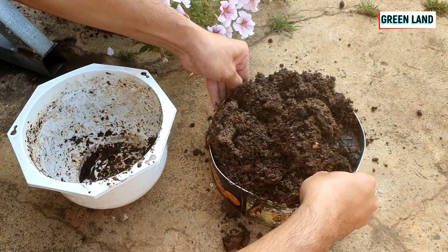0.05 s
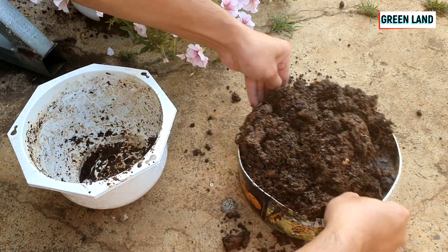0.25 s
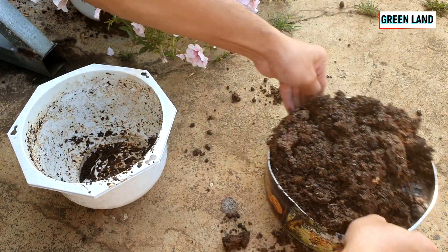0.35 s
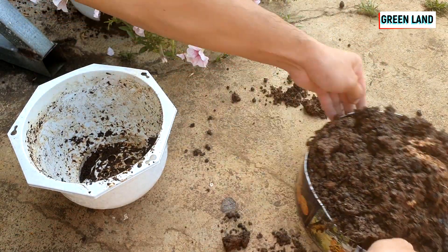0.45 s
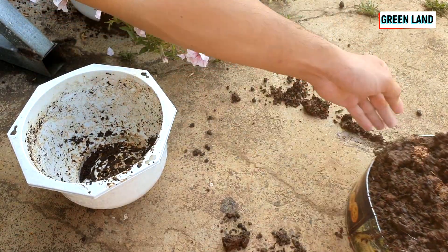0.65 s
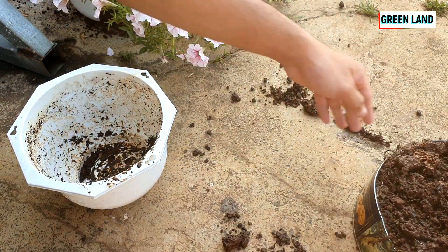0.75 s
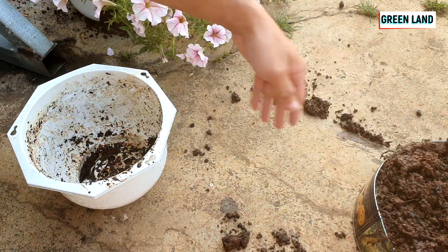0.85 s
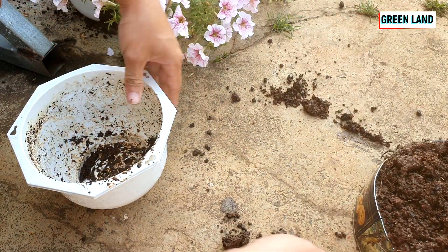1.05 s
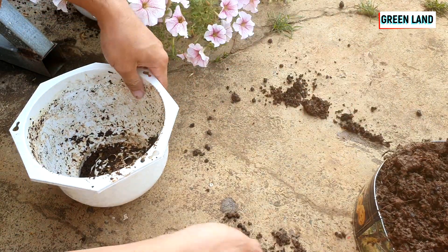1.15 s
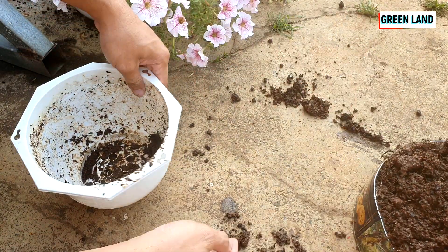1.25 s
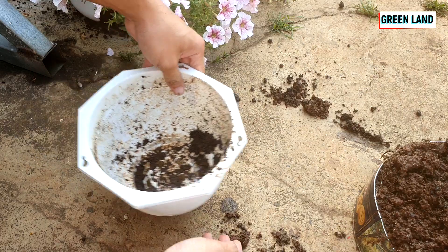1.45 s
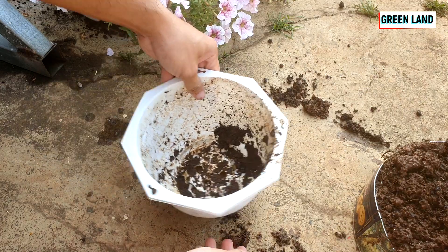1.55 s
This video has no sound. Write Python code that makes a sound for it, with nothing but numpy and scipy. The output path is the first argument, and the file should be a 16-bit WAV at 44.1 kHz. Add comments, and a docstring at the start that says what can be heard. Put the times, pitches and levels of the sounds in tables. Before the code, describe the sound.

A heavy pot of soil is dragged over rough concrete with a short, juddering scrape, sand crackling under it. A few crumbs drop, then fingers lightly tap an empty plastic pot. Close up, outdoors, over a faint rumble.

```python
"""Outdoors on rough concrete, close to a pair of microphones, over a low rumble and a faint hiss.
A heavy pot full of soil is nudged, then dragged: its base slips and catches, ringing the damped pot,
while sand is ground and cracks under it. The pot stops and three crumbs of soil drop.
Last, a hand takes up an empty plastic pot with light taps. Nearby walls give back short echoes."""
import sys
import numpy as np
from scipy import signal
from scipy.fft import rfft, irfft
from scipy.io import wavfile
from scipy.ndimage import map_coordinates

SR = 44100
rng = np.random.default_rng(int(sys.argv[2]) if len(sys.argv) > 2 else 0)


def generate_wav(sig):
    """Save sig (samples, or channels by samples) to the path in sys.argv[1] as 16-bit PCM at SR."""
    pcm = np.round(np.clip(np.atleast_2d(sig).T, -1, 1) * 32767).astype(np.int16)
    wavfile.write(sys.argv[1], SR, pcm)


N = 70560  # 1.6 s


def amp(db):
    """Decibels to gain."""
    return 10 ** (np.asarray(db) / 20)


def unit(x):
    """Scale to rms 1."""
    return x / np.sqrt(np.mean(np.abs(x) ** 2) + 1e-20)


def along(points, hz):
    """Read (Hz, value) points on a log frequency axis."""
    point_hz, values = np.transpose(points)
    return np.interp(np.log(hz + 1), np.log(point_hz + 1), values)


def curves(rows):
    """One value per sample for each column after the time."""
    times, *columns = np.transpose(rows)
    return [np.interp(np.arange(N) / SR, times, column) for column in columns]


def grid():
    """The frequencies in Hz on which filters are given."""
    return np.fft.rfftfreq(2 * N, 1 / SR)


def filtered(x, response):
    """Pass x through a frequency response."""
    return irfft(rfft(x, 2 * N) * response)[..., :N]


def causal(gain):
    """The promptest (minimum-phase) response with this shape, at unit power."""
    cepstrum = irfft(np.log(gain + 1e-6))
    cepstrum[1:N] *= 2
    cepstrum[N + 1:] = 0
    return unit(np.exp(rfft(cepstrum)))


def colour(points):
    """Response with the given (Hz, dB) shape."""
    return causal(amp(along(points, grid())))


def wobble(rate):
    """A smooth random curve, rate knots a second."""
    return map_coordinates(rng.standard_normal(N), [np.arange(N) * rate / SR], mode="wrap")


def pan(db):
    """Left and right gains for a level difference."""
    return amp(np.array([[db], [-db]]) / 2)


def fade(start, t60):
    """An envelope that jumps up at start and falls 60 dB in t60 seconds."""
    age = np.arange(N) / SR - start
    return (age >= 0) * np.exp(-np.log(1000) * np.abs(age) / t60)


def burst(start, t60):
    """A short puff of noise, different in two channels."""
    return fade(start, t60) * rng.standard_normal((2, N))


def microphones(pair, lean=1):
    """Two unrelated signals become left and right: alike in the bass, mostly leaning left."""
    # Each row: frequency in Hz, likeness of the two microphones (clipped to a correlation below).
    likeness = [(60, 3.06), (200, 0.66), (400, 1.03), (700, 0.22), (1300, 0), (15000, 0)]
    # Each row: frequency in Hz, left over right in dB at a lean of 1.
    balance = [(60, 2), (200, 0), (400, 3.5), (700, 6), (1300, -3), (2400, -1), (4400, 3.5), (15000, 6)]
    turn = np.arccos(np.clip(along(likeness, grid()), -1, 1)) / 2
    mid, side = filtered(pair, np.array([np.cos(turn), np.sin(turn)]))
    left_db = lean * along(balance, grid()) / 2
    return filtered(np.array([mid + side, mid - side]), amp([left_db, -left_db]))


def background():
    """The open air: a steady distant rumble and a faint hiss that rises and falls."""
    # The two spectra. Each row: frequency in Hz, relative level in dB.
    rumble_shape = [(15, -22), (30, -18.5), (45, -7), (62, 5.5), (78, -1.5), (95, -4.5), (125, -13),
                    (170, -6), (260, -14.5), (450, -27.5), (1000, -71.5)]
    hiss_shape = [(240, -24), (400, 0), (1140, -8.5), (1500, -11), (2800, -12.5), (7500, -26),
                  (12700, -26.5), (16000, -36)]
    # Each row: time in seconds, level of the hiss in dB.
    hiss_levels = [(0, -62.5), (.85, -56), (1.15, -61.5), (1.24, -52), (1.3, -56), (1.4, -60.5),
                   (1.5, -66.5), (1.58, -62)]
    beds = []
    for shape in (rumble_shape, hiss_shape):
        noise = filtered(rng.standard_normal((2, N)), amp(along(shape, grid())))
        beds.append(unit(microphones(noise)))
    rumble, hiss = beds
    return amp(-49.5) * rumble + amp(curves(hiss_levels)[0]) * hiss


def wall_echoes(near):
    """Nearby walls return a short, diffuse tail that lasts longest in the mids."""
    # Each row: frequency in Hz, t60 of the echoes in seconds.
    decay_times = [(200, 0.1), (2500, 0.26), (12000, .14)]
    hz, t, spectra = signal.stft(rng.standard_normal((2, SR // 2)), SR, nperseg=256)
    decay = np.exp(-np.log(1000) * t / along(decay_times, hz)[:, None])
    tail = signal.istft(spectra * decay, SR, nperseg=256)[1]
    return signal.fftconvolve(near, tail / np.linalg.norm(tail[0]), axes=1)[:, :N]


def soil_crumbs():
    """Falling crumbs of soil land with soft, dull ticks."""
    # Each row: start in seconds, level in dB.
    landings = [(.8785, -40.5), (1.0085, -45.5), (1.0613, -37)]
    # Each row: frequency in Hz, relative level of a tick in dB.
    tick_shape = [(150, -17.5), (400, 2.5), (700, 11), (1200, -14), (2500, -6.5), (6000, -26),
                  (15000, -30.5)]
    ticks = sum(amp(db) * burst(start, t60=0.026) for start, db in landings)
    return microphones(filtered(ticks, colour(tick_shape)))


def plastic_taps():
    """Each touch of a finger clicks on the empty pot's rim and briefly rings the thin plastic."""
    # Each row: start in seconds, ring level in dB, click level in dB, left over right in dB.
    touches = [(1.1912, -60, -48.5, 12.5), (1.2204, -43, -24.5, 11.5), (1.2630, -27, -19, 6),
               (1.3715, -55, -56, 2), (1.4201, -58, -66, 12), (1.5755, -57.5, -74.5, -1)]
    # Each row: frequency of a mode in Hz, level in dB, t60 in seconds.
    modes = [(374, 3.5, 0.025), (513, 0, 0.045), (1460, -1, 0.02), (2155, 4, 0.013), (2880, 1.5, 0.011),
             (3380, -0.5, 0.018), (4130, -4, 0.018), (4990, -3.5, 0.011), (9600, -4, 0.0061)]
    # Each row: frequency in Hz, relative level of the click in dB.
    click_shape = [(500, -25), (1500, -17), (4000, -3), (6800, -14.5), (9500, 0.5), (13000, -6.5),
                   (16000, -19)]
    attack_s, bright = 0.00083, colour(click_shape)
    t, out = np.arange(N) / SR, np.zeros((2, N))
    for start, ring_db, click_db, pan_db in touches:
        age, ring = t - start, np.zeros((2, N))
        for hz, db, t60 in modes:
            phase = rng.normal(0, 1.0, (2, 1))
            ring += amp(db) * fade(start, t60) * np.sin(2 * np.pi * hz * age + phase)
        click = filtered(burst(start, t60=0.009), bright)
        rise = 1 - np.exp(-np.maximum(age, 0) / attack_s)
        out += pan(pan_db) * rise * (amp(ring_db) * ring + amp(click_db) * click)
    return out


def soil_heave():
    """The weight of the soil trembles in the bass as the pot moves."""
    # Each row: time in seconds, level in dB.
    levels = [(.08, -57), (.14, -49), (.17, -48), (.2, -42.5), (.28, -49.5), (.345, -36), (.41, -52),
              (.455, -34), (.485, -43), (.525, -36.5), (.6, -46), (.645, -39.5), (.69, -51), (.76, -42.5),
              (.84, -60.5)]
    # Each row: frequency in Hz, relative level in dB.
    tremble_shape = [(25, -33.5), (55, -0.5), (90, 1), (150, 0), (210, -4.5), (400, -19.5), (900, -60)]
    tremble = filtered(rng.standard_normal((2, N)), colour(tremble_shape))
    return amp(curves(levels)[0]) * unit(microphones(tremble))


def grit_cracks():
    """Larger grains burst under the pot's weight with a bright snap."""
    # Each row: start in seconds, level in dB, t60 in seconds, left over right in dB.
    grains = [(0.1385, -50.5, 0.018, 5), (0.2107, -35, 0.011, 3), (0.2202, -36.5, 0.013, 3),
              (0.3077, -15.5, 0.016, 2), (0.3272, -33.5, 0.017, 1), (0.4203, -26, 0.01, -3),
              (.4555, -25.5, .02, -4.5), (0.4944, -15.5, 0.019, -3.5), (0.5508, -20.5, 0.011, -3.5),
              (0.6383, -27.5, .03, -2.5), (0.7281, -23, 0.048, 0), (0.7358, -24, 0.018, -3),
              (0.797, -41.5, 0.0095, -1), (0.8022, -38, 0.0087, 2.5)]
    # Each row: frequency in Hz, relative level of a snap in dB.
    snap_shape = [(180, -16), (500, 0.5), (1000, -9.5), (2250, -5), (4100, -1), (6000, -0.5), (9000, -4),
                  (13000, -8.5), (16000, -20.5)]
    bright = colour(snap_shape)
    return sum(pan(pan_db) * microphones(filtered(amp(db) * burst(start, t60), bright))
               for start, db, t60, pan_db in grains)


def contacts(per_second, spread_db):
    """Tiny impacts at random moments, a few stronger than the rest, shared between two channels."""
    hit = rng.random(N) < per_second / SR
    size = amp(spread_db * np.minimum(rng.exponential(size=N), 3))
    direction = 2 * np.pi * rng.random(N)
    return unit(hit * size * np.array([np.cos(direction), np.sin(direction)]))


def base_catches():
    """The base hits bumps in the concrete: each gives one blunt push and a little rattle."""
    # Each row: start in seconds, strength of the push in dB.
    bumps = [(.1838, -30.5), (0.2423, -23.5), (0.3129, -22), (.3283, -9.5), (0.4136, -24), (0.4473, -7.5),
             (0.4546, -4), (0.505, -11), (0.5549, -8), (0.582, -16), (0.67, -12.5), (0.7866, -19)]
    rattle_gain, cutoff_hz = 0.0093, 900  # the heavy base is too slow to push sharply
    push = np.zeros((2, N))
    for start, db in bumps:
        push += amp(db) * rattle_gain * burst(start, t60=0.012)
        push[0, round(start * SR)] -= amp(db)
    return filtered(push, 1 / (1 + 1j * grid() / cutoff_hz))


def pot_body(pitch_ratio, boom_db, damping):
    """Response of the soil-filled pot; damping widens its resonances."""
    # Each row: frequency and width in Hz (before pitch ratio and damping), relative level in dB.
    resonances = [(374.6, 57, -5), (450, 41, -3), (466.6, 33, -3.5), (666.3, 45, -1.5), (739, 126, -2),
                  (868, 8.3, -2.5), (986, 100, -5), (1095, 60, -7), (1372, 97, -7.5), (1547, 75, -11.5),
                  (1690, 520, -17), (2460, 88, -18), (3810, 120, -21.5)]
    # Each row: frequency in Hz (before pitch ratio), how well the pot radiates in dB.
    radiation = [(60, -12), (250, -6.5), (350, -2.5), (510, 2.5), (580, -5), (660, -2.5), (4000, -3.5),
                 (12000, -10)]
    boom_hz, boom_width_hz = 235, 110
    f, power = grid() / pitch_ratio, 0
    for hz, width_hz, db in [*resonances, (boom_hz, boom_width_hz, boom_db)]:
        loss = f * width_hz * damping
        power += (amp(db) * loss) ** 2 / ((hz * hz - f * f) ** 2 + loss ** 2)
    return causal(np.sqrt(power) * amp(along(radiation, f)))


def pot_drag():
    """Slips and catches ring the pot, whose tone sinks as it settles; sand is ground under it."""
    # Each row: time in seconds, relative levels in dB of the pot's rasp and of the sand.
    levels = [(.085, -56, -78), (.115, -47.5, -64), (.143, -39, -60), (.162, -57, -68.5), (.181, -68, -67),
              (.186, -35, -50), (.212, -30.5, -47.5), (.232, -46.5, -56), (.246, -31, -45.5),
              (.264, -54.5, -68), (.303, -61, -63), (.315, -54.5, -53.5), (.342, -30, -50.5),
              (.368, -33.5, -40), (.386, -22.5, -34), (.405, -37, -46.5), (.417, -22, -31), (.44, -25, -37),
              (.455, -13, -29), (.484, -26, -31.5), (.51, -16.5, -29.5), (.534, -25.5, -35.5),
              (.557, -19.5, -34), (.585, -21, -38), (.624, -32.5, -39), (.643, -19.5, -30),
              (.658, -36.5, -50.5), (.673, -25, -39), (.734, -24.5, -34), (.774, -39, -51),
              (.797, -37.5, -38), (.83, -75.5, -86.5)]
    # Each row: frequency in Hz, relative level of the sand in dB.
    sand_shape = [(200, -43.5), (600, -9.5), (1500, 1.5), (2400, -3.5), (3200, -1.5), (3900, 2.5),
                  (5500, -5), (8000, -11.5), (12500, -13), (16000, -24)]
    # The pot starts tipped on its edge and settles flat.
    # Each row: time in seconds, pitch ratio, low boom in dB, share of the leftward lean.
    stances = [(.24, 1.11, -2, 0.63), (.38, 1.127, -6, 0.5), (.455, 0.97, -11.5, 0.93),
               (.55, 1.045, -20.5, 1.1), (.7, .96, -32, 1.5)]
    rasp_db, sand_db = curves(levels)
    t = np.arange(N) / SR
    moving = (t > levels[0][0]) * (t < levels[-1][0])
    judder = moving * amp(wobble(rate=130))  # the level flutters by about 1 dB
    slips = contacts(per_second=2200, spread_db=4) * judder * amp(rasp_db - 0.5)
    sand = contacts(per_second=1700, spread_db=2) * judder * amp(sand_db + 2)
    out = microphones(filtered(sand, colour(sand_shape)))
    pushes = base_catches()
    stance_times = [row[0] for row in stances]
    for (_, pitch_ratio, boom_db, lean), this_stance in zip(stances, np.eye(len(stances))):
        crossfade = np.interp(t, stance_times, this_stance)
        sliding = pot_body(pitch_ratio, boom_db, damping=0.98)
        caught = pot_body(pitch_ratio, boom_db, damping=1.73)
        rasp = filtered(crossfade * slips, sliding)
        knocks = filtered(crossfade * pushes, caught / np.abs(irfft(caught)).max())
        out += microphones(rasp + knocks, lean)
    return out


def scene():
    """The handling close to the microphones, its weak echoes and the open air behind."""
    near = pot_drag() + grit_cracks() + soil_crumbs() + plastic_taps()
    return near + amp(-13.5) * wall_echoes(near) + soil_heave() + background()


def record(dry):
    """The recorder keeps nothing above its band limit."""
    top_hz = 16200
    return filtered(dry, grid() < top_hz)


dry = scene()
out = record(dry)
generate_wav(out)
```